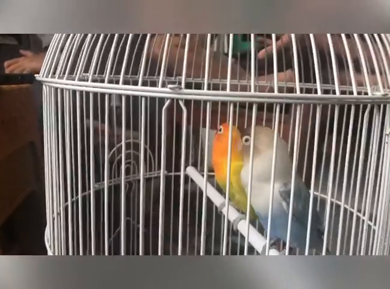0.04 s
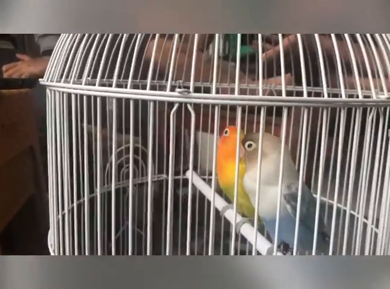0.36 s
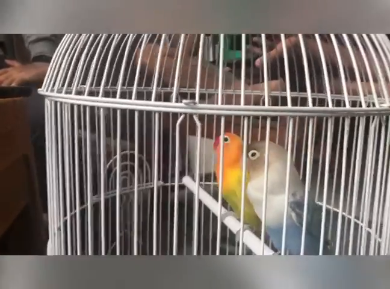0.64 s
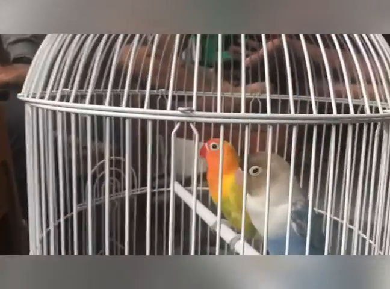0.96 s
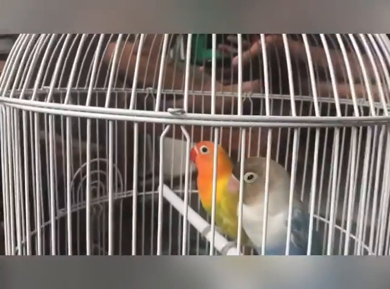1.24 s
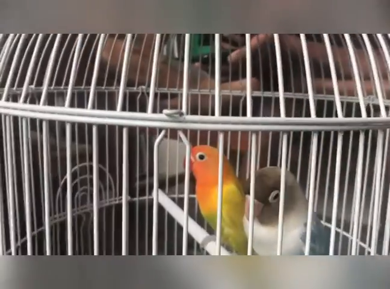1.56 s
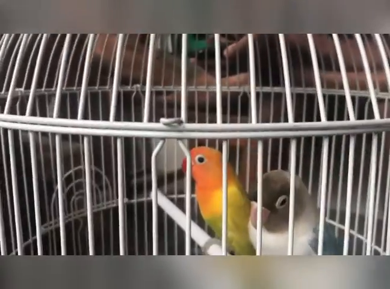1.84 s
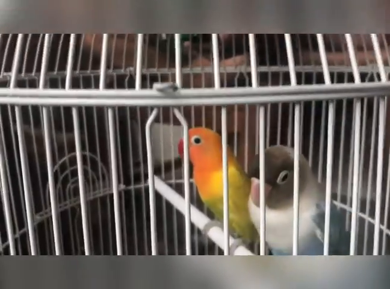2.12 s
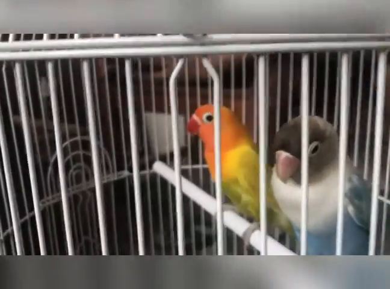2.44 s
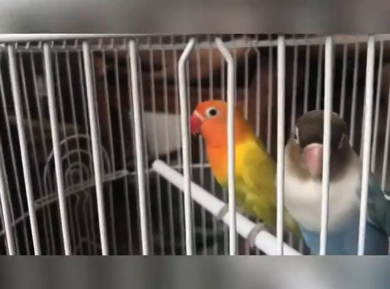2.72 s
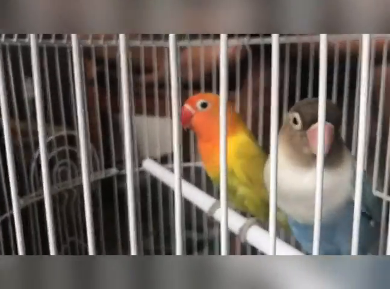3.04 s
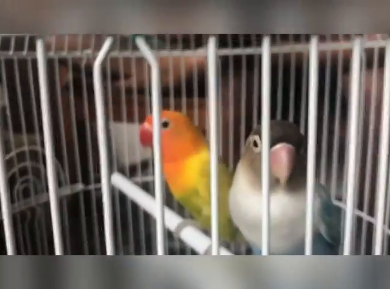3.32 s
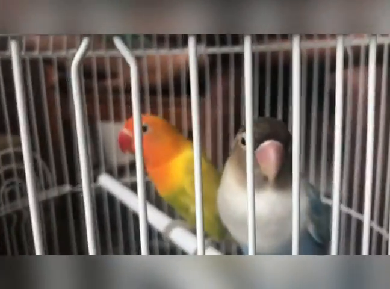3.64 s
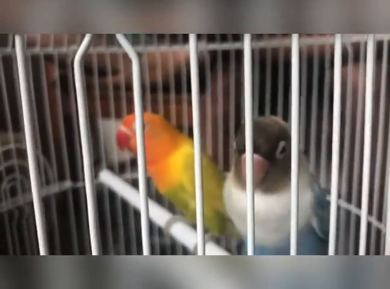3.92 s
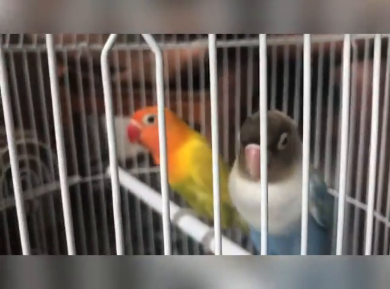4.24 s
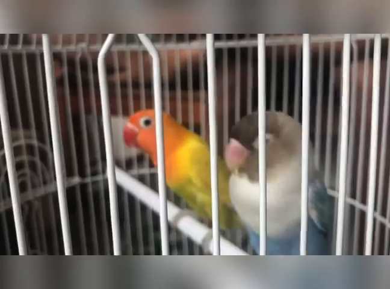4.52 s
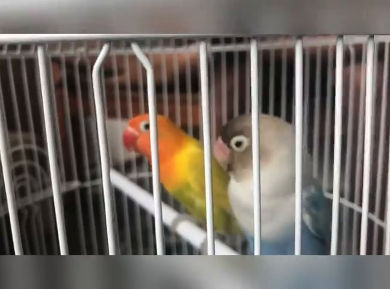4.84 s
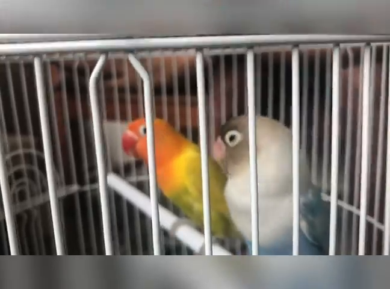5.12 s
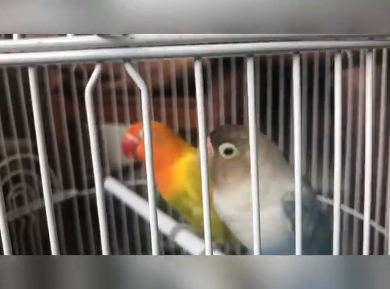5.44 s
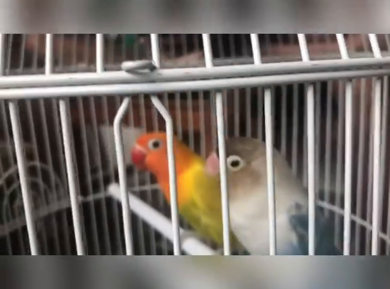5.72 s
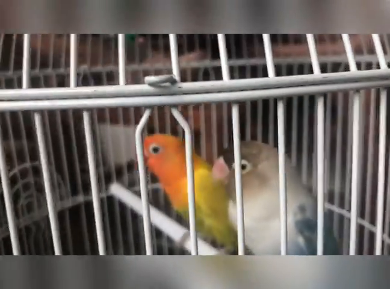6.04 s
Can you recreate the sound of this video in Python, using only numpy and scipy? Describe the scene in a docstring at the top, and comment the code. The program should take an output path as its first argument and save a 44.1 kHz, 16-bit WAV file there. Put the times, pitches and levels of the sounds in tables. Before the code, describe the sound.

Two lovebirds call in a small room, their short, high voices carrying a slight echo. From the start, moving air rumbles unevenly on the microphone. A reedy, climbing squawk sounds at about 0.1 seconds, and a second at 1.2 seconds runs into a hoarse rasp. The rumble stops abruptly at 1.6 seconds. At about 2.4 seconds comes a quick burst of chatter, its notes flipping up into thin whistles. A third squawk follows at 3.7 seconds, ending in a scratchy flick. From 5 to 5.4 seconds a rapid run of shrill, whistly chatter builds to the loudest notes. Very faint distant birds chirp or whistle around 2, 4.7 and 5.8 seconds. A deep drone that comes and goes, a faint hum and a soft low rush of room noise continue until the end at about 6 seconds.

```python
"""Two lovebirds call in a wire cage in a small room, their voice organs buzzing or whistling with breath.
At first moving air rumbles on the microphone, under two climbing squawks and a hoarse rasp.
The air stops at 1.6 s. Quick chatter follows at 2.4 s, the voice flipping up into thin whistles.
A third squawk comes at 3.7 s, and the loudest chatter from 5 s on. Faint far-off birds call in between,
and a low drone, a hum and soft room noise stay to the end."""
import sys
import numpy as np
from scipy import signal
from scipy.fft import rfft, irfft, next_fast_len
from scipy.io import wavfile
from scipy.ndimage import map_coordinates

SR = 44100
rng = np.random.default_rng(int(sys.argv[2]) if len(sys.argv) > 2 else 0)


def put_to_file(sound):
    """Save the sound as 16-bit audio at rate SR, in the file named by the first command-line argument."""
    columns = np.atleast_2d(sound).T  # one column per channel
    safe = np.clip(columns, -1, 1)
    whole_steps = np.round(safe * 32767)
    wavfile.write(sys.argv[1], SR, whole_steps.astype(np.int16))


N = 267731
TOP_HZ = 15750  # the microphone picks up nothing higher


def lovebirds():
    """Each call reaches the microphone directly, and again after bouncing around the room."""
    calls = [(RASP[0][0], rasp())]
    for sing, table in [(squawk, SQUAWKS), (flick, FLICKS), (chatter, CHATTER), (whistle, WHISTLES)]:
        calls += [(start, sing(*row)) for start, *row in table]
    track = np.zeros(N)
    for start, call in calls:
        add(track, start, call)
        add(track, start, room(call, early_db=-12, tail_db=-13.5, build_s=0.0052))
    return track


# Squawks: t/s, length/s, start f/Hz, top f/Hz, first quaver peak/s, start level/dB,
# overtone boost/dB, extra roughness at the start/0-1
SQUAWKS = [(0.116, 0.16, 1954, 2503, 0.03, -18.5, 2, 0.23), (1.196, 0.11, 2274, 2417, 0.016, -20, -5.5, 0),
           (3.664, 0.170, 1996, 2444, 0.0352, -17, 0, 0.33)]
def squawk(length, start_hz, top_hz, crest_s, db, overtone_db, rough):
    """A reedy tone that climbs and quavers, fading as it grows cleaner."""
    climb_s, clear_s, fade_db_per_s = 0.075, 0.025, 34
    quaver_rate_hz, quaver_depth_hz = 19.6, 40.6
    t = clock(length)
    quaver = quaver_depth_hz * np.cos(2 * np.pi * quaver_rate_hz * (t - crest_s))
    pitch = top_hz + (start_hz - top_hz) * np.exp(-t / climb_s) + quaver
    roughness = 0.086 + rough * np.exp(-t / clear_s)
    return voice(pitch, db - fade_db_per_s * t, roughness, overtone_db)


# Chatter notes: t/s, slide/s, hold/s, drop/s, low part/s, start f/Hz, high f/Hz, low f/Hz,
# high level/dB, level at the drop/dB, end level/dB, overtone boost/dB, base roughness/0-1
CHATTER = [(2.375, 0.022, 0.031, 0.0091, 0.026, 2915, 3300, 2690, -15.5, -20.5, -26.5, 1, 0.35),
           (2.5, 0.0068, 0.013, 0.0064, 0.025, 3630, 3330, 2122, -14.5, -23.5, -14, -3, 0.35),
           (4.97, 0.033, 0.011, 0.02, 0.029, 2834, 3240, 2655, -16, -22, -20.5, 7, 0.3),
           (5.096, 0.016, 0.0027, 0.0055, .027, 4090, 3635, 2168, -17, -22.5, -14.5, -3, 0.47),
           (5.18, .014, .036, .014, 0.025, 1677, 3347, 2757, -14, -7, -11, 4.5, 0.04),
           (5.331, .015, 0.0033, 0.00505, 0.02, 1696, 3424, 2850, -4, -9, -12, -7, 0.02)]
def chatter(slide_s, hold_s, drop_s, low_s, start_hz, high_hz, low_hz,
            high_db, drop_db, end_db, overtone_db, rough):
    """A note slides to a high pitch, holds it, then drops into a lower voice and relaxes."""
    sag_hz_per_s, rest_hz = 3360, 2470
    slide_end, hold_end, drop_end, end = np.cumsum([slide_s, hold_s, drop_s, low_s])
    t = clock(end)
    sagged_hz = high_hz - sag_hz_per_s * hold_s
    relaxed_hz = low_hz + 0.25 * (rest_hz - low_hz)
    pitch = np.interp(t, [0, slide_end, hold_end, drop_end, end],
                      [start_hz, high_hz, sagged_hz, low_hz, relaxed_hz])
    # a note that starts lower starts softer, with weaker overtones
    octaves_below = np.log2(high_hz / pitch) * (t < slide_end)
    db = np.interp(t, [slide_end, hold_end, end], [high_db, drop_db, end_db]) - 20 * octaves_below
    # the voice is roughest as it starts and as it drops
    strain = np.interp(t, [0, slide_end, hold_end + drop_s / 2, end], [1.33, 0.5, 1.33, 0.5])
    return voice(pitch, db, rough * strain, overtone_db - 19 * octaves_below)


# Whistles that end the chatter notes: t/s, length/s, start f/Hz, end f/Hz, start level/dB,
# middle level/dB, overtone boost/dB, roughness/0-1
WHISTLES = [(2.455, 0.027, 6360, 6610, -23, -14.5, -12, .13),
            (2.551, .024, 6040, 6300, -30, -18, 8.5, 0.28), (5.058, .026, 6390, 6680, -22, -16, -11, 0.34),
            (5.149, .019, 6140, 6520, -21.5, -20, -0.5, 0.5), (5.264, 0.024, 6260, 7050, -23, -7, 5, 0),
            (5.372, 0.022, 5990, 6585, -10, -6, 8.5, 0)]
def whistle(length, start_hz, end_hz, snap_db, db, overtone_db, rough):
    """The voice snaps up in one scratchy leap to a thin rising tone that swells and fades."""
    snap_from_hz, snap_s = 2300, 0.0022
    t = clock(length)
    leap = np.clip(1 - t / snap_s, 0, 1)
    rise = (t / length) ** 0.7  # quick at first
    pitch = start_hz + (end_hz - start_hz) * rise - (start_hz - snap_from_hz) * leap
    ends_db = np.interp(t, [0, length], [snap_db, db - 5.5])
    level_db = ends_db + (db - ends_db) * np.sin(np.pi * t / length)
    return voice(pitch, level_db, rough + 0.35 * leap, overtone_db)


# Flicks: t/s, length/s, bottom f/Hz, top f/Hz, top level/dB, overtone boost/dB, roughness/0-1
FLICKS = [(0.277, 0.037, 2285, 3326, -20.5, 1.5, 0.7), (1.179, 0.019, 2360, 2910, -20, 5, 0.64),
          (2.362, 0.0142, 2990, 3510, -17.5, 4, 0.84), (3.836, 0.027, 2287, 3480, -16, 7, .55),
          (4.953, 0.023, 3260, 3546, -17, 7, .85)]
def flick(length, foot_hz, top_hz, db, overtone_db, rough, swell_db=7.5):
    """A quick hoarse up-and-down of pitch and loudness that opens or closes a call."""
    arch = np.sin(np.pi * clock(length) / length) ** 1.3
    pitch = foot_hz + (top_hz - foot_hz) * arch
    return voice(pitch, db - swell_db * (1 - arch), rough, overtone_db)


# The course of the rasp after the second squawk: t/s, f/Hz, level/dB
RASP = [(1.303, 3834, -17), (1.325, 3250, -20.5), (1.376, 3346, -19), (1.397, 4155, -19.5),
        (1.405, 4300, -24.5)]
def rasp():
    """A hard-pressed, hoarse tone that sags and rises again."""
    start, end = RASP[0][0], RASP[-1][0]
    pitch, db = curves(RASP, start + clock(end - start))
    return voice(pitch, db, rough=0.88, overtone_db=-3)


def voice(pitch, db, rough, overtone_db, pulse_hz=175, edge_s=0.0018):
    """The voice organ sings a tone with overtones; pressed hard, it shakes and breaks into pulses."""
    size = len(pitch)
    t = np.arange(size) / SR
    rough = np.clip(rough, 0, 1)
    shaky_pitch = pitch * (1 + 0.064 * rough * wobble(1600, size))
    multiples = np.arange(1, 9)[:, None]  # the base tone and seven overtones
    levels = tone_balance(pitch, multiples, overtone_db)
    # the vibration is unsteady, so each of these tones flickers on its own
    unrest = np.sqrt(rough) * (1 - rough / 2)
    flicker = amp(5 * unrest * np.array([wobble(376.3, size) for _ in multiples]))
    tone = np.sqrt(2) * np.sum(levels * flicker * np.sin(multiples * phase(shaky_pitch)), axis=0)
    breath = amp(-6) * rough * beak_air(size)
    pulse_rate = pulse_hz * (1 + 0.427 * wobble(pulse_hz, size))
    pulses = 1 + 0.7 * rough ** 2 * np.cos(phase(pulse_rate))
    flutter = amp(-unrest * wobble(830, size))
    soft_edges = np.clip(np.minimum(t, t[-1] - t) / edge_s, 0, 1)
    return amp(db) * (tone + breath) * pulses * flutter * soft_edges


# Overtones next to the base tone, reedy when low and nearly pure when high:
# base f/Hz, first overtone level/dB, upper overtones level/dB
OVERTONES = [(2000, 17.5, 10.5), (2310, 11, 6), (2356, -1.5, -11.5), (2470, -5.5, -6.5), (2764, 5.5, 1),
             (2856, 1.5, -0.5), (3250, -8, -20.5), (3390, -21, -24.5), (4150, -27, -30), (6370, -17, -40)]
# How strongly throat and beak ring: f/Hz, level/dB
THROAT = [(1700, -21.5), (3400, 8), (4300, 3.5), (5000, -5.5), (6400, 1), (7400, -2), (8600, 3),
          (10000, -4.5), (11400, -1), (12400, -13.5), (13300, -17.5), (15500, -29)]
def tone_balance(pitch, multiples, overtone_db):
    """Share the sound among base tone and overtones; throat and moving beak favour some upper ones."""
    size = len(pitch)
    octave_db, upper_db = curves(OVERTONES, pitch)
    upper_hz = multiples[2:] * pitch
    shimmer_db = 3 * np.array([wobble(67, size) for _ in upper_hz])
    ring = amp(along(THROAT, upper_hz) + shimmer_db) * (upper_hz < TOP_HZ)
    upper = amp(upper_db + overtone_db) * ring / np.sqrt(np.sum(ring ** 2, axis=0) + 0.01)
    levels = np.vstack([np.ones(size), amp(octave_db + overtone_db), upper])
    return levels / np.linalg.norm(levels, axis=0)


# Tone colour of the breath: f/Hz, level/dB
BREATH_COLOUR = [(1900, -28), (3200, 7), (4200, 6), (5100, -2.5), (6300, 2.5), (7400, -15), (8600, -0.5),
                 (10000, -20), (11400, 5), (12200, -6), (13000, -31)]
def beak_air(size):
    """Air swirls at the open beak and makes a scratchy noise."""
    return noise(BREATH_COLOUR, size)


# How long the room rings: f/Hz, time to fade by 60 dB/s
ROOM_FADE = [(500, 0.93), (3000, 0.43), (6500, 0.38), (10000, 0.42), (15000, 0.24)]
# Tone colour of the echoes: f/Hz, level/dB
ROOM_COLOUR = [(1500, -6.5), (3000, -2), (4500, 6), (6500, 1), (9000, -2.5), (14000, 1.5)]
def room(x, early_db, tail_db, build_s):
    """Twelve echoes off nearby surfaces and a fading tail, drawn at random for each sound."""
    hz, t, bands = signal.stft(rng.standard_normal(SR // 2), SR, nperseg=256)
    fade = amp(-60 * t / along(ROOM_FADE, hz)[:, None])
    build_up = 1 - np.exp(-t / build_s)
    tail = signal.istft(bands * fade * build_up, SR, nperseg=256)[1]
    walls = np.zeros(len(tail))
    walls[(rng.uniform(0.002, 0.022, size=12) * SR).astype(int)] = rng.standard_normal(size=12)
    echoes = amp(tail_db) * tail / np.linalg.norm(tail) + amp(early_db) * walls / np.linalg.norm(walls)
    return signal.fftconvolve(x, filtered(echoes, lambda hz: amp(along(ROOM_COLOUR, hz))))


# Strength of the moving air: t/s, level/dB
GUSTS = [(0.01, -15.5), (0.108, -22.5), (0.122, -17), (0.388, -23.5), (0.504, -16.5), (0.712, -23.5),
         (1.356, -24), (1.386, -26), (1.422, -24), (1.482, -25.5), (1.57, -22.5)]
# Tone colour of its rumble: f/Hz, level/dB
RUMBLE_COLOUR = [(35, -20), (60, -14.5), (76, -4.5), (124, 3), (211, -5.5), (266, -3), (376, -9),
                 (510, -8.5), (775, -13), (1900, -34.5), (2470, -37.5), (4180, -120)]
# How alike left and right are: f/Hz, likeness/0-1
RUMBLE_LIKENESS = [(60, 0.74), (120, 0.47), (400, 0.19), (1500, 0.067)]
def draught(end_s=1.605, fade_s=0.02):
    """Moving air hits the two microphone openings a little differently, then stops short."""
    t = np.arange(N) / SR
    shared = noise(RUMBLE_COLOUR)
    apart = filtered(noise(RUMBLE_COLOUR), lambda hz: np.tan(np.arccos(along(RUMBLE_LIKENESS, hz)) / 2))
    left_right = np.array([amp(-1.2) * (shared + apart), amp(1) * (shared - apart)])
    lumps = amp(1.5 * wobble(30.16, N))
    stop = np.clip((end_s - t) / fade_s, 0, 1)
    return left_right * loudness(GUSTS) * lumps * stop


# Faint far-off calls: t/s, length/s, start f/Hz, end f/Hz, level before the room/dB, shake/share of pitch
FAR_CHIRPS = [(2.01, 0.076, 6140, 5820, -57, 0.04), (2.088, 0.036, 5360, 5000, -62, 0.046),
              (4.639, 0.3, 3830, 4300, -58.5, 0.016), (4.707, 0.29, 8230, 8240, -58, 0.012),
              (5.758, 0.132, 8660, 8450, -69.5, .015), (5.779, 0.095, 4760, 4810, -64, .015)]
def far_birds():
    """Distant chirps and thin wavering whistles arrive only as echoes of the room."""
    track = np.zeros(N)
    for start, length, start_hz, end_hz, db, shake in FAR_CHIRPS:
        size = int(length * SR)
        waver = 1 + shake * wobble(690, size) + 0.011 * wobble(40, size)
        pitch = np.linspace(start_hz, end_hz, size) * waver
        swell = np.hanning(size) * amp(4 * wobble(30, size))
        chirp = amp(db) * unit(swell * np.sin(phase(pitch)))
        add(track, start, room(chirp, early_db=1, tail_db=-6, build_s=0.008))
    return track


# Loudness of the drone: t/s, level/dB
DRONE_LEVEL = [(0.0, -24), (0.44, -33), (0.56, -26), (0.83, -38), (1.1, -21.5), (1.99, -43), (2.15, -27.5),
               (3.08, -41.5), (3.62, -30.5), (4.73, -43), (4.77, -55), (5.11, -32.5), (5.66, -36),
               (5.7, -51.5), (6.02, -41.5), (6.07, -52)]
def drone():
    """A deep wavering tone that comes and goes."""
    return loudness(DRONE_LEVEL) * wavering_tone(hz=52.9)


# Tones of the hum: f/Hz, level/dB
HUM_TONES = [(118.4, -49.5), (253, -51.5), (506, -56)]
# One swell at the lowest of those pitches: t/s, level/dB
HUM_SWELL = [(4.5, -54), (4.6, -33.5), (4.9, -36), (5.05, -49)]
def hum():
    """Three faint, nearly steady tones; the lowest swells once."""
    steady = sum(amp(db + 0.71 * wobble(2.89, N)) * wavering_tone(hz) for hz, db in HUM_TONES)
    return steady + loudness(HUM_SWELL) * wavering_tone(HUM_TONES[0][0])


# Loudness of the room noise: t/s, level/dB
NOISE_LEVEL = [(2.0, -31.5), (4.9, -33.5), (5.3, -37), (5.9, -33)]
# Its tone colour: f/Hz, level/dB
NOISE_COLOUR = [(15, -44.5), (25, -29), (43, -1.5), (61, -2.5), (79, -11.5), (113, -5), (198, -12.5),
                (253, -11.5), (445, -16), (495, -16.5), (648, -19), (1380, -25.5), (1950, -32), (6050, -43),
                (15500, -56.5)]
def room_noise():
    """A soft, low rush fills the room."""
    return loudness(NOISE_LEVEL) * amp(0.17 * wobble(8, N)) * noise(NOISE_COLOUR)


# Loudness of the hiss: t/s, level/dB
HISS_LEVEL = [(0, -48.5), (.5, -55), (.7, -47), (1, -71), (1.58, -67), (1.63, -75), (1.85, -51), (2.1, -76),
              (6.07, -68)]
def hiss():
    """A thin hiss, strongest in the first two seconds."""
    return loudness(HISS_LEVEL) * noise([(1000, -3), (4000, -9), (15000, -19)])


def amp(db):
    """Turn decibels into a factor to multiply by."""
    return 10 ** (np.asarray(db) / 20)


def unit(x):
    """Scale a sound to an average power of 1."""
    return x / np.sqrt(np.mean(x ** 2) + 1e-20)


def clock(length):
    """Sample times over a length in seconds."""
    return np.arange(int(length * SR)) / SR


def phase(hz):
    """The running angle of a tone whose pitch changes."""
    return 2 * np.pi * np.cumsum(hz) / SR


def wavering_tone(hz, waver_hz=2.5):
    """A pure tone whose pitch wanders a little."""
    return np.sqrt(2) * np.sin(phase(hz + waver_hz * wobble(10, N)))


def along(points, hz):
    """Read between (f/Hz, value) points, with octaves evenly spaced."""
    f, values = np.transpose(points)
    return np.interp(np.log(hz + 1), np.log(f + 1), values)


def curves(rows, at):
    """Each column after the first, read at the given values of the first."""
    first, *columns = np.transpose(rows)
    return [np.interp(at, first, column) for column in columns]


def loudness(points):
    """Turn (t/s, level/dB) points into a volume curve for the whole scene."""
    return amp(curves(points, np.arange(N) / SR)[0])


def wobble(rate, size):
    """A smooth curve through `rate` random values a second."""
    return map_coordinates(rng.standard_normal(int(size * rate / SR) + 4), [np.arange(size) * rate / SR])


def filtered(x, response):
    """Turn each frequency in x up or down by response(hz)."""
    padded = next_fast_len(x.shape[-1] + SR // 4)
    return irfft(rfft(x, padded) * response(np.fft.rfftfreq(padded, 1 / SR)), padded)[..., :x.shape[-1]]


def noise(colour, size=N):
    """Noise of power 1, shaped by (f/Hz, level/dB) points."""
    return unit(filtered(rng.standard_normal(size), lambda hz: amp(along(colour, hz))))


def add(track, start_s, x):
    """Mix x into the track at the given time."""
    part = track[max(round(start_s * SR), 0):][:len(x)]
    part += x[:len(part)]


def scene():
    """Birds and background are the same on both sides; only the draught differs left and right."""
    return lovebirds() + far_birds() + drone() + hum() + room_noise() + hiss() + draught()


def record(dry):
    """The microphone loses the deepest bass, rounds the loudest peaks and cuts the highest treble."""
    low_cut_hz, ceiling = 40, 0.93
    sound = filtered(dry, lambda hz: 1 / np.sqrt(1 + (low_cut_hz / (hz + 1)) ** 6))
    sound = sound / (1 + np.abs(sound / ceiling) ** 10) ** (1 / 10)
    return filtered(sound, lambda hz: hz < TOP_HZ)


dry = scene()
out = record(dry)
put_to_file(out)
```